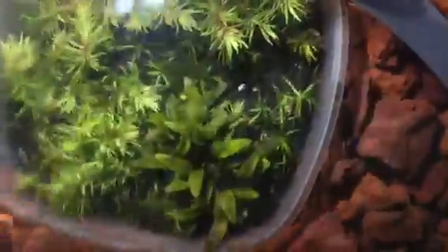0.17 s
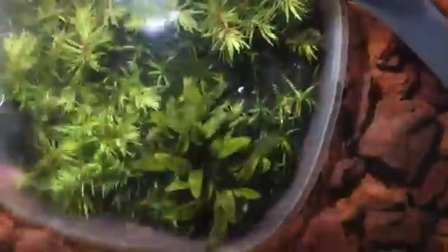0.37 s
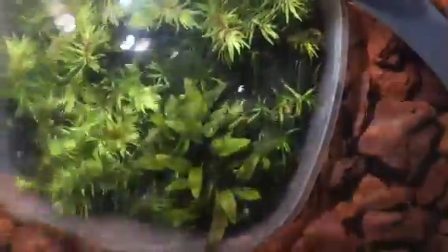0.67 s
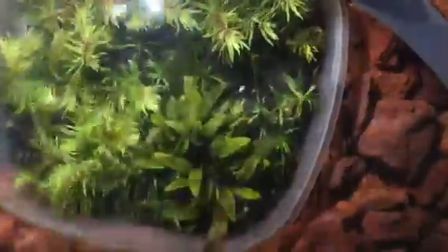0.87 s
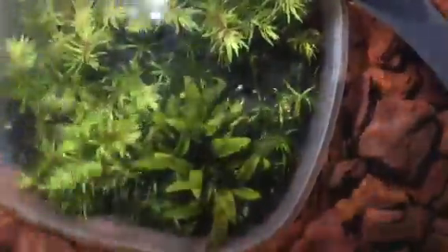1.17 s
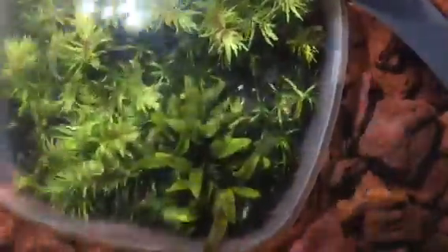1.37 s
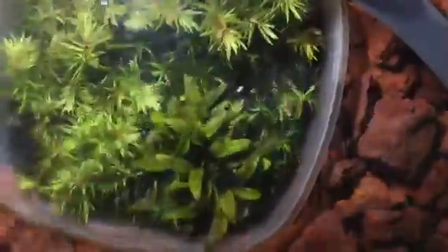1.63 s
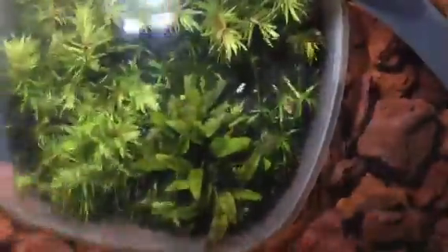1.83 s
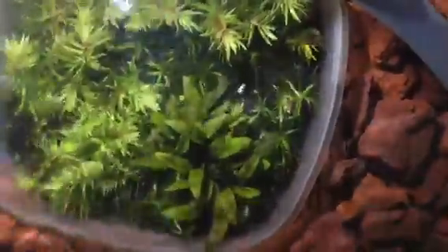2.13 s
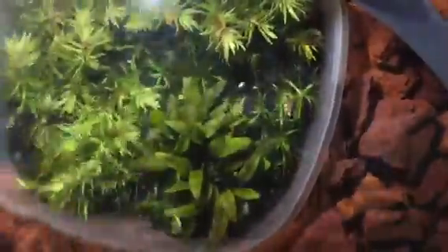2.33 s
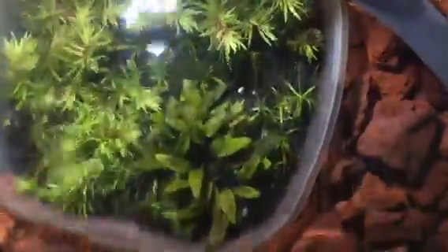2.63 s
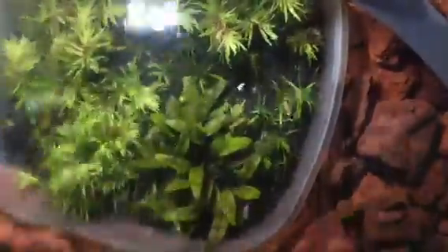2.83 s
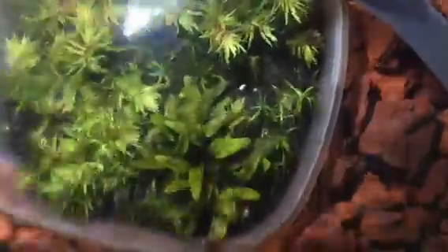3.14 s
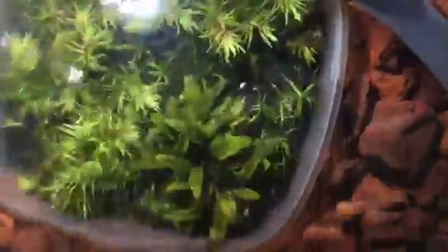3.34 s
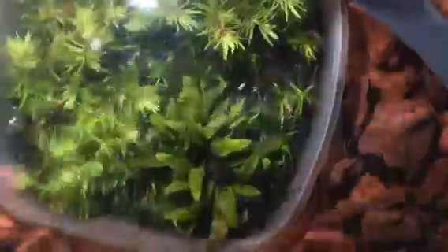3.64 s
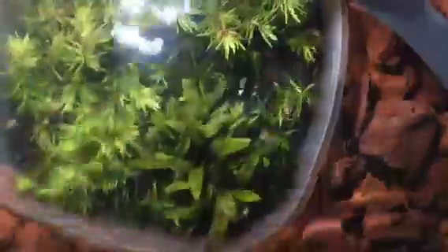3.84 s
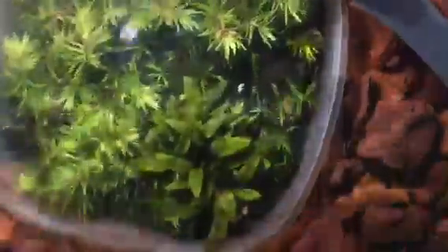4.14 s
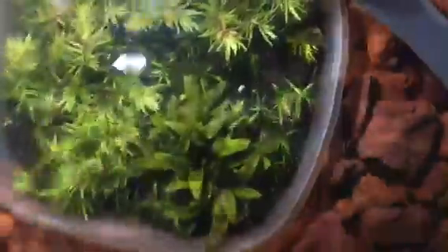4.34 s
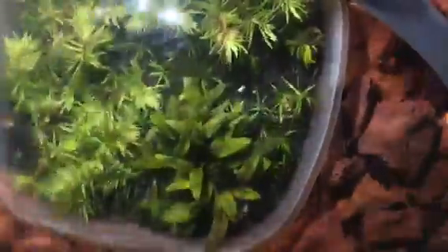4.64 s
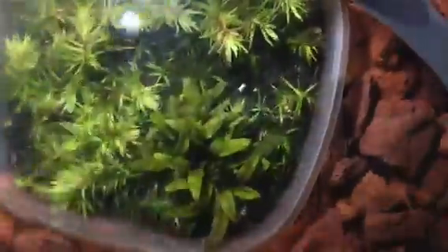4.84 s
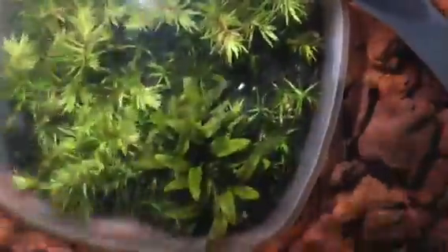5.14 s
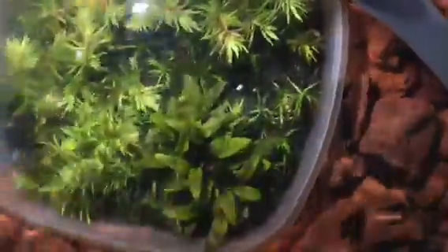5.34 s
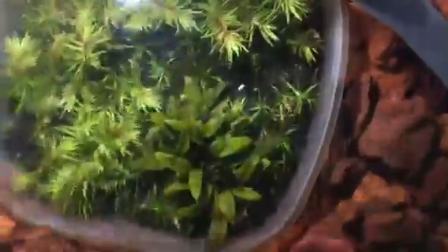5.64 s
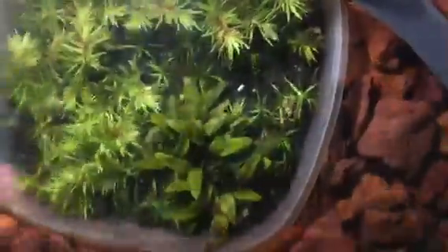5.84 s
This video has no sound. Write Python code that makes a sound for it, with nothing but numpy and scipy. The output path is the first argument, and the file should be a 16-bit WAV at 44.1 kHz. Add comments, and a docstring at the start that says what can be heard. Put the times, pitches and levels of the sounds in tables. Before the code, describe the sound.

An aquarium pump hums throughout, heard close in a quiet room: a low electric drone with a light buzz and a soft rumble. Beneath it runs a faint, even wash of circulating water. Light, high ticks crackle in a short flurry during the first 0.7 seconds, then return sparsely to the end. Four tiny bubbles pop, at about 1.9, 2.4, 3.9 and 4.1 seconds. The one at 3.9 seconds is the clearest, a small snap with a very brief ring; the others are fainter and higher. At 2.1 seconds the drone thins slightly and a soft midrange hiss joins it. Near 4.6 seconds the hiss ebbs and the full drone returns, carrying on with the water and a few more faint ticks until about 6 seconds. Everything stays quiet and fairly dry.

```python
"""A mains-driven pump hums beside an aquarium in a quiet room, over a faint wash of circulating water.
Light, high ticks open in a short flurry, then come sparsely throughout.
From 1.9 to 4.1 s four tiny bubbles pop: the film snaps, the cavity rings.
At 2.1 s the drone thins and a midrange hiss joins; near 4.6 s the hiss ebbs and the full drone returns."""
import sys
import numpy as np
from scipy import signal
from scipy.fft import rfft, irfft
from scipy.io import wavfile

SR = 44100
rng = np.random.default_rng(int(sys.argv[2]) if len(sys.argv) > 2 else 0)


def transcribe(u):
    """Save the signal u as a 16-bit wav file named by the first command-line argument.

    u: samples, shape (n,) or (channels, n), limited to [-1, 1]; the rate is SR.
    q: integer samples, one column per channel.
    """
    v = np.clip(np.atleast_2d(u).T, -1, 1)
    q = np.round(v * 32767).astype(np.int16)
    wavfile.write(sys.argv[1], SR, q)


N = 264600
T = np.arange(N) / SR
MAINS_HZ = 59.975
THIN_FROM_S, THIN_UNTIL_S = 2.102, 4.551


def drone(thin, waver_db=0.38):
    """Motor vibration at the lowest mains multiples, strongest at the second."""
    # motor harmonics: mains multiple, full level/dB rms, thin level/dB rms
    harmonics = [(1, -42.5, -44.9), (2, -31.5, -33.8), (3, -51.2, -49.1), (4, -46.5, -49.3),
                 (5, -52.3, -53.7), (6, -48.1, -47.0)]
    out = np.zeros(N)
    for multiple, full_db, thin_db in harmonics:
        level_db = full_db + (thin_db - full_db) * thin + waver_db * drift(5.1)
        out += partial(multiple, level_db, thin)
    return out


def buzz(thin, base_db=-70, fall_db_per_octave=7.5, waver_db=0.86, first=7, count=44):
    """Higher mains multiples, falling with pitch and shaped by the pump housing."""
    # housing resonances and one dip: f/Hz, width/Hz, lift/dB
    housing = [(420, 35, 2.5), (560, 41, 7.5), (694, 56, -11), (807, 67, 8.5), (1029, 46, 13),
               (1165.2, 69.3, 25.5), (1440, 24, 15.5), (1860, 38, 11), (2880, 140, 9.5)]
    # low hollow and midrange gain while thin: f/Hz, width/Hz, lift/dB
    thin_lift = [(476, 37, -18), (920, 265, 4)]
    out = np.zeros(N)
    for multiple in range(first, first + count):
        hz = multiple * MAINS_HZ
        full_db = base_db - fall_db_per_octave * np.log2(multiple / first) + lift_db(hz, housing)
        level_db = full_db + thin * lift_db(hz, thin_lift) + waver_db * drift(6)
        out += partial(multiple, level_db, thin)
    return out


def partial(multiple, rms_db, thin, spread_cycles=1.006, slip_rad=1.5):
    """One mains multiple; each starts at its own fixed phase, keeping the buzz smooth."""
    offset_cycles = spread_cycles * multiple ** 2.5
    phase = 2 * np.pi * (multiple * MAINS_HZ * T - offset_cycles) - slip_rad * thin  # slip: a soft bump
    return np.sqrt(2) * from_db(rms_db) * np.sin(phase)


def thinness(ramp_s=0.0088):
    """0 while the drone is full, 1 while thin."""
    onset = np.clip((T - THIN_FROM_S) / ramp_s + .5, 0, 1)
    offset = np.clip((T - THIN_UNTIL_S) / ramp_s + .5, 0, 1)
    return onset - offset


def rumble():
    """Low noise of the pump in its resonant cabinet."""
    # rumble spectrum: f/Hz, density/(dB per Hz)
    spectrum = [(18, -88), (45, -80), (85, -75), (135, -77.5), (220, -80.5), (300, -79.5), (335, -84),
                (400, -85), (480, -100), (3000, -160)]
    # cabinet resonances: f/Hz, width/Hz, peak density/(dB per Hz)
    cabinet_modes = [(196, 33, -70.5), (255, 24, -74.5), (650, 24, -87.5)]
    return noise(spectrum, cabinet_modes)


def whine(waver_db=1, wander_rad=.5):
    """Faint high pump tones, wavering in level and phase."""
    # whine tones: f/Hz, level/dB rms
    tones = [(8102, -90), (8995, -101), (9238, -96), (9356, -88.5), (9415, -93.5), (9658, -90)]
    out = np.zeros(N)
    for hz, rms_db in tones:
        amplitude = np.sqrt(2) * from_db(rms_db + waver_db * drift(10))
        out += amplitude * np.sin(2 * np.pi * hz * T + wander_rad * drift(5.6))
    return out


def pops(rise_s=0.00038, film_trim_db=-4, snap_t60_s=0.03, snap_width_hz=2600,
         spray_db=-25, spray_t60_s=.014):
    """A bubble's film snaps around its pitch with a bright spray; the cavity rings briefly."""
    # bubbles: t/s, f/Hz, cavity level/dB, cavity t60/s, film level before trim/dB
    bubbles = [(1.904, 8300, -45, .005, -48), (2.366, 14500, -57, .005, -62),
               (3.927, 2380, -31.5, 0.018, -38.5), (4.1035, 15000, -47, .003, -49)]
    out, t = np.zeros(N), T[:SR // 10]
    for start_s, hz, cavity_db, t60_s, film_db in bubbles:
        envelope = decay(t, t60_s) * (1 - np.exp(-t / rise_s))
        cavity = from_db(cavity_db) * np.sin(2 * np.pi * hz * t) * envelope
        film = from_db(film_db + film_trim_db) * rng.standard_normal(len(t))
        snap = resonance(film * decay(t, snap_t60_s), hz, snap_width_hz)
        spray = from_db(spray_db) * film * decay(t, spray_t60_s)
        add(out, start_s, cavity + snap + spray)
    return out


def ticks(gain_db=9.5, direct_db=-24.5, t60_s=0.061):
    """Brief crackles, all ringing the same high modes."""
    # clearest ticks: t/s, level before gain/dB
    clear = [(0.2024, -59), (0.2339, -57), (0.2583, -56.5), (0.4574, -56.5), (0.4788, -61), (0.5454, -53.5),
             (0.6913, -65), (2.5002, -54.5), (2.9592, -59), (3.1018, -66), (3.3682, -62), (3.8062, -59),
             (4.3774, -59), (4.5825, -57), (4.9681, -60), (5.5019, -59), (5.5613, -59), (5.7069, -61),
             (5.9189, -57)]
    # tick resonances: f/Hz, width/Hz, gain/dB
    modes = [(6300, 170, -1), (6620, 200, 0), (7860, 160, -9), (8980, 260, -8), (13200, 600, -15)]
    flurry = scatter(from_s=.125, until_s=.35, per_s=63, level_db=-62)
    strays = scatter(from_s=.35, until_s=T[-1], per_s=2, level_db=-66.5)
    power, t = np.zeros(N), T[:SR // 10]
    for start_s, level_db in list(clear) + flurry + strays:
        add(power, start_s, (from_db(level_db + gain_db) * decay(t, t60_s)) ** 2)
    crackle = np.sqrt(power) * rng.standard_normal(N)
    ringing = sum(from_db(db) * resonance(crackle + 1e-18, hz, width_hz) for hz, width_hz, db in modes)
    return ringing + from_db(direct_db) * crackle


def scatter(from_s, until_s, per_s, level_db, spread_db=1, max_count=40):
    """Ticks at uneven gaps: rows of t/s, level/dB."""
    chance = rng.random((max_count, 2))
    times_s = from_s + (np.arange(max_count) + chance[:, 0]) / per_s
    levels_db = level_db + spread_db * (2 * chance[:, 1] - 1)
    return [(s, db) for s, db in zip(times_s, levels_db) if s < until_s]


def wash(ripple_db=.5):
    """Circulating water: soft, slightly rippling noise."""
    # wash spectrum: f/Hz, density/(dB per Hz)
    spectrum = [(300, -100), (550, -90), (720, -93), (850, -91.5), (1400, -91), (1580, -99), (2600, -99),
                (3400, -108.5), (4500, -105), (4950, -109.5), (5600, -107), (6600, -108.5), (7600, -112.5),
                (9500, -112.5), (10400, -120), (11200, -118), (13500, -117.8), (15600, -120.5)]
    # wash resonances: f/Hz, width/Hz, peak density/(dB per Hz)
    modes = [(964, 49, -90), (1830, 140, -96), (2060, 170, -96.5), (2445, 190, -95), (3070, 390, -103),
             (3706, 350, -102), (4330, 650, -105), (5270, 270, -110), (6330, 110, -107), (9200, 370, -113),
             (11100, 440, -120)]
    return from_db(ripple_db * drift(15)) * noise(spectrum, modes)


def hiss(attack_s=.025, release_s=.25):
    """Midrange hiss while the sound's colour switches and the hum is thin."""
    # hiss spectrum: f/Hz, density/(dB per Hz)
    spectrum = [(400, -115), (620, -94.5), (850, -89.5), (1250, -92.5), (1450, -91), (1750, -112),
                (3000, -160)]
    swell = np.clip((T - THIN_FROM_S) / attack_s, 0, 1)
    ebb = np.clip((THIN_UNTIL_S - T) / release_s + .5, 0, 1)
    return swell * ebb * noise(spectrum)


def room(x, echo_s=0.008, echo_db=-7, tail_db=-17, t60_s=0.087):
    """Direct sound, one tank-wall reflection, a short diffuse tail."""
    t = T[:SR // 3]
    tail = rng.standard_normal(len(t)) * decay(t, t60_s) * (t > echo_s / 2)
    response = from_db(tail_db) * tail / np.linalg.norm(tail)
    response[0] += 1
    response[int(echo_s * SR)] += from_db(echo_db)
    return signal.fftconvolve(x, response)[:N]


def noise(spectrum, modes=()):
    """Steady noise of a given density, plus resonance humps."""
    hz = np.maximum(np.arange(N // 2 + 1) * SR / N, 1)
    knots_hz, density_db = np.transpose(spectrum)
    power = from_db(np.interp(np.log(hz), np.log(knots_hz), density_db)) ** 2
    for centre_hz, width_hz, peak_db in modes:
        power += from_db(peak_db) ** 2 / (1 + 2 * ((hz - centre_hz) / width_hz) ** 2) ** 2
    return irfft(rfft(rng.standard_normal(N)) * np.sqrt(power * SR / 2), N)


def drift(rate_hz):
    """Smooth random curve, standard deviation 1."""
    coarse_s = T[::100]
    hz = np.arange(len(coarse_s) // 2 + 1) * SR / N
    white = rng.standard_normal(len(coarse_s))
    slow = irfft(rfft(white) / (1 + (hz / rate_hz) ** 2), len(coarse_s))
    return np.interp(T, coarse_s, slow / slow.std())


def resonance(x, hz, width_hz):
    """Two-pole band-pass, peak gain 1."""
    r = np.exp(-np.pi * width_hz / SR)
    feedback = [1, -2 * r * np.cos(2 * np.pi * hz / SR), r * r]
    return signal.lfilter(np.array([1, 0, -1]) * (1 - r * r) / 2, feedback, x)


def lift_db(hz, bells):
    """Sum of bell-shaped lifts and dips at hz."""
    return sum(db * np.exp(-((hz - centre_hz) / width_hz) ** 2) for centre_hz, width_hz, db in bells)


def decay(t, t60_s):
    """Envelope falling 60 dB in t60_s."""
    return np.exp(-np.log(1000) * t / t60_s)


def from_db(db):
    """Decibels to gain."""
    return 10 ** (np.asarray(db) / 20)


def add(track, start_s, sound):
    """Mix sound into track at start_s."""
    start = int(start_s * SR)
    track[start:start + len(sound)] += sound[:N - start]


def scene():
    """Pump and water throughout, hiss in the middle, pops and ticks on top; mono."""
    thin = thinness()
    pump = whine() + drone(thin) + buzz(thin) + rumble()
    return (pump + wash() + hiss() + room(pops() + ticks()))[None]


def record(dry):
    """Steep elliptic low-pass."""
    cutoff_hz = 15650
    return signal.sosfilt(signal.ellip(12, .1, 80, cutoff_hz, fs=SR, output="sos"), dry)


dry = scene()
out = record(dry)
transcribe(out)
```